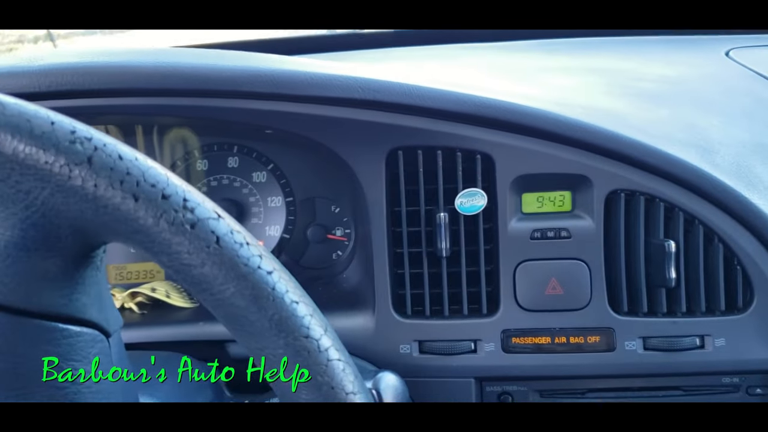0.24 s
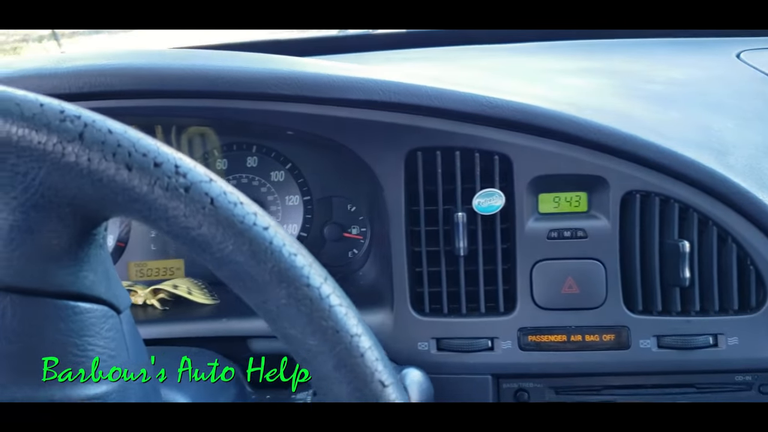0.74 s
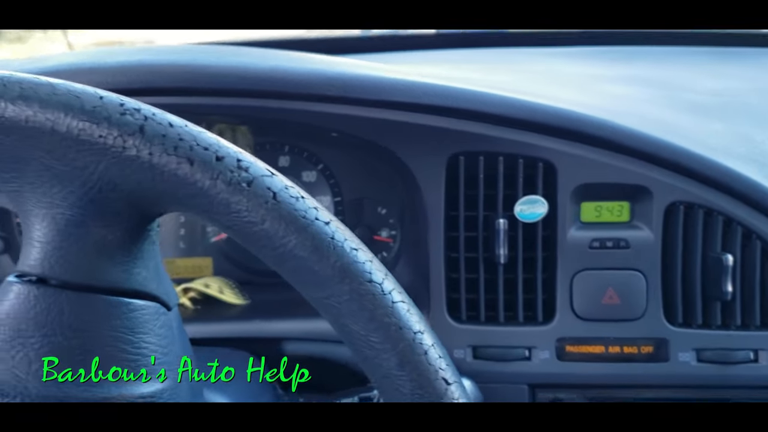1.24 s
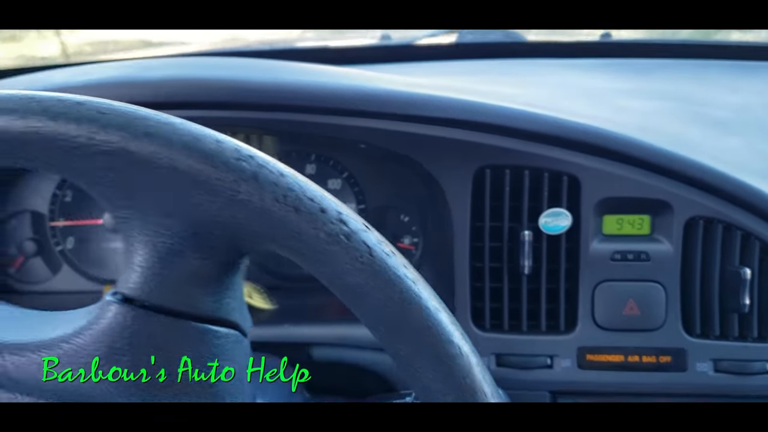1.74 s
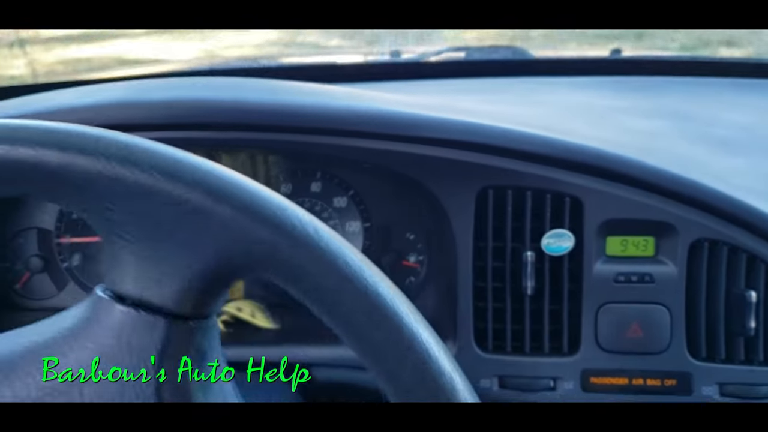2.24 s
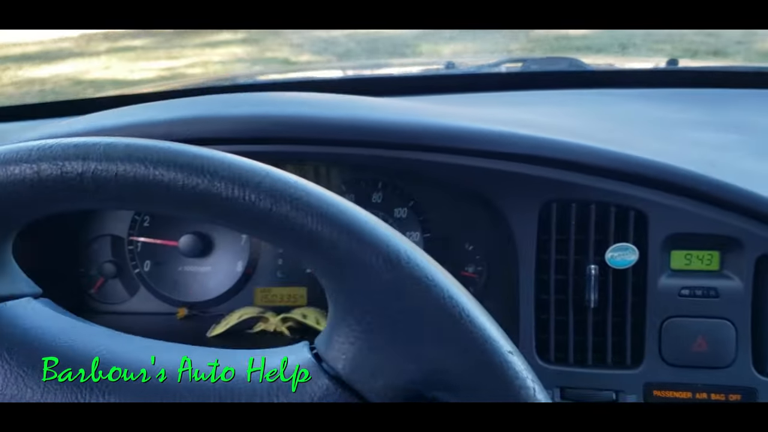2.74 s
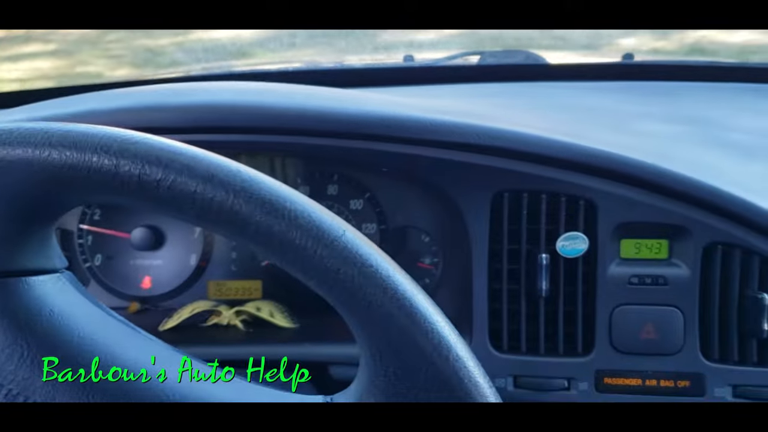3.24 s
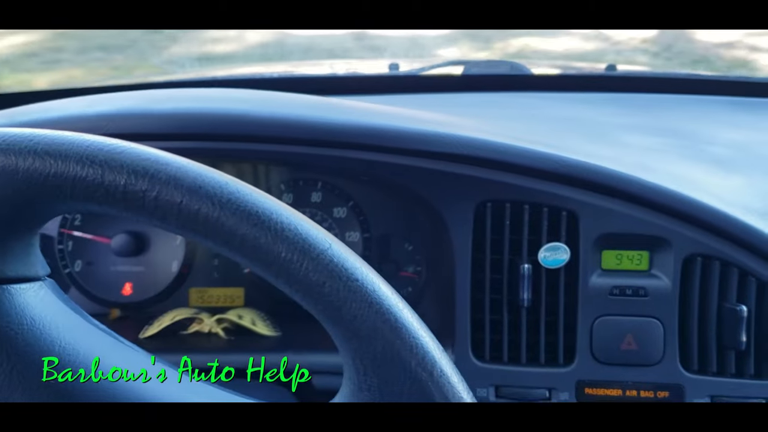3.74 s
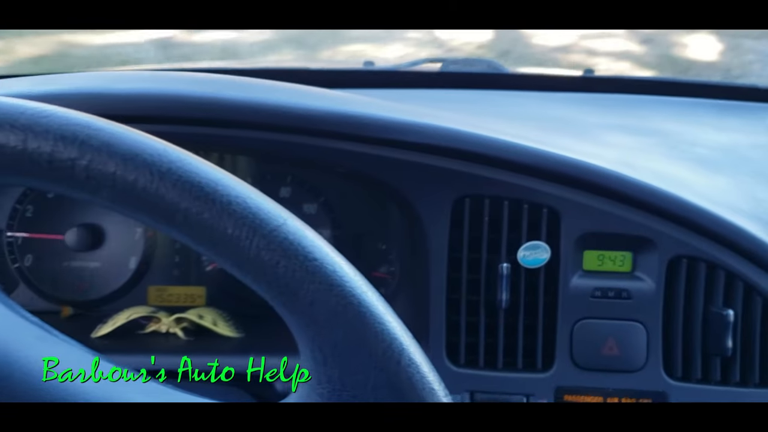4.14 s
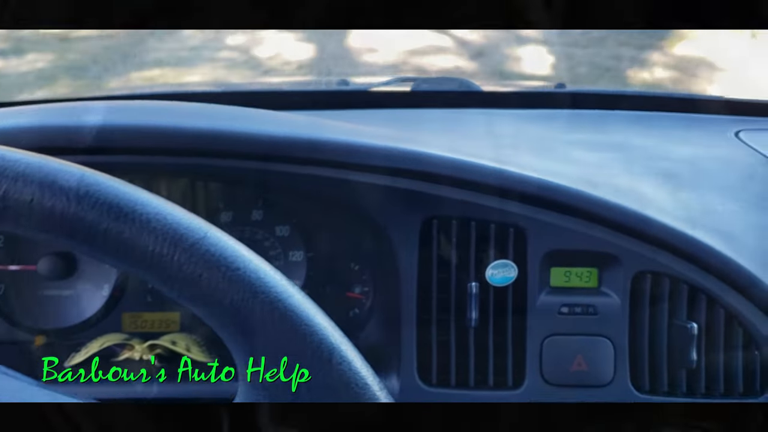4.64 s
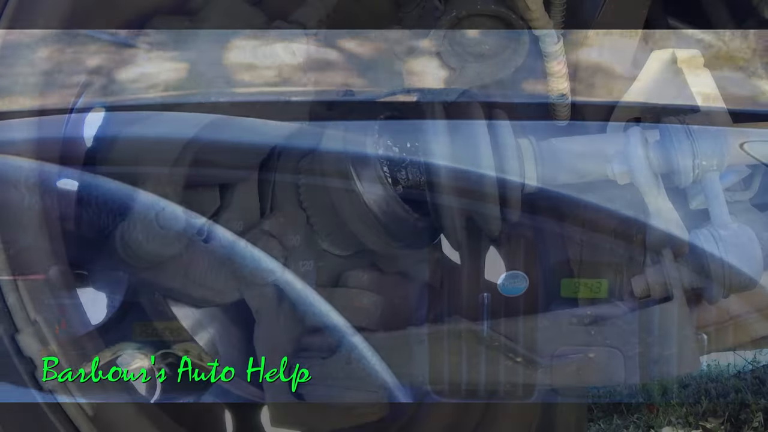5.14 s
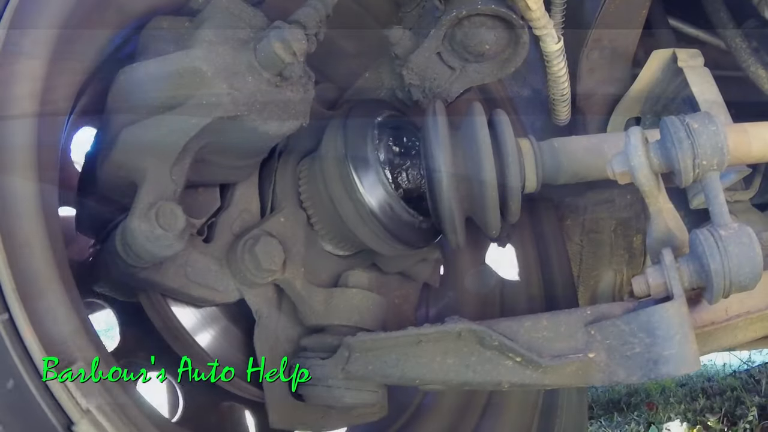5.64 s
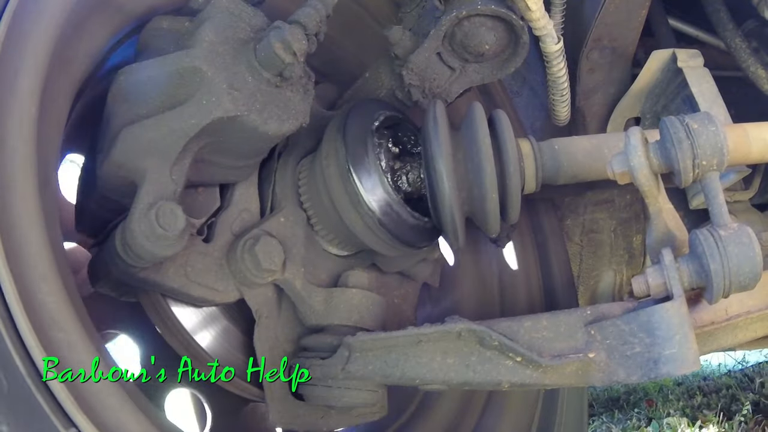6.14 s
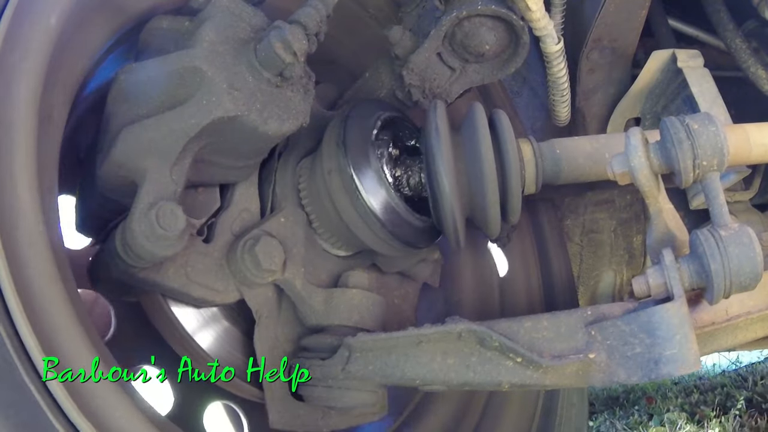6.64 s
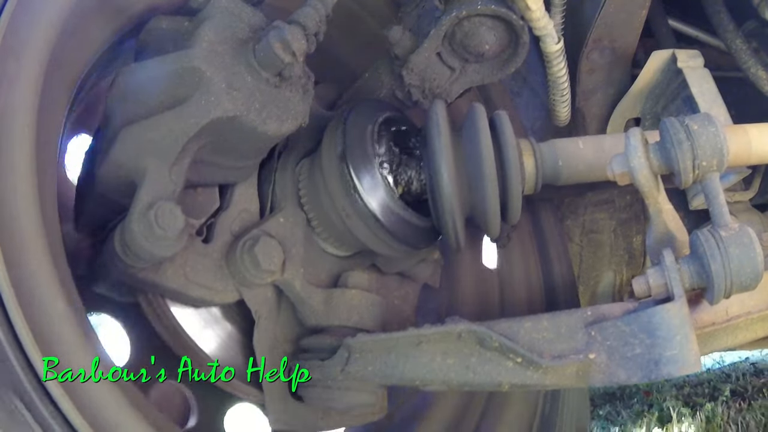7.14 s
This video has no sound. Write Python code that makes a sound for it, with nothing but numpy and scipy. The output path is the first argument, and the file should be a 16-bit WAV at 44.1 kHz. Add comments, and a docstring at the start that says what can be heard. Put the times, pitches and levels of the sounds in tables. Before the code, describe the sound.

Irregular knocks from a worn car axle joint over engine hum, shifting to louder underside rumble, rising whine and a sharp metallic crack.

```python
"""Worn drive joint in a tight turn

After a clatter in the cabin, a car creeps into a turn. The worn joint knocks through the resonances of
the body, over engine hum and rolling noise, while the steering groans and trim rattles. The sound then
blends to a microphone under the front wheel: exhaust pulses, gear whine, roar, hiss and ticking grit.
One sharp crack of the joint rings its housing and makes the limiter duck."""
import sys
import numpy as np
from scipy import signal
from scipy.io import wavfile
from scipy.ndimage import uniform_filter1d, map_coordinates

SR = 44100
rng = np.random.default_rng(int(sys.argv[2]) if len(sys.argv) > 2 else 0)


def wav_out(sig):
    """Save sig, one row per channel (or a flat mono array), as 16-bit PCM at SR to the path in sys.argv[1]."""
    wavfile.write(sys.argv[1], SR, np.round(np.clip(np.atleast_2d(sig).T, -1, 1) * 32767).astype(np.int16))


N = 325899
T = np.arange(N) / SR

# Driving as heard in the cabin: time_s, firing_hz, engine_db, rolling_db
CABIN_DRIVE = [(0, 31.8, -40.5, -40), (.7, 32.59, -40.5, -38.5), (2.05, 30.99, -39.5, -41.5),
               (2.3, 36.04, -29, -38.5), (2.55, 44.6, -38.5, -36), (2.82, 44.04, -34.5, -39),
               (3.08, 45.83, -34, -34), (3.35, 52.93, -35, -29.5), (3.65, 51, -35.5, -31),
               (3.85, 44.4, -38.5, -36), (4.02, 38.87, -33, -38.5), (4.3, 35.15, -40, -41.5),
               (4.6, 34.02, -41, -42)]
# Share of the cabin microphone: time_s, gain
CABIN_SHARE = [(4.6, 0.94), (5.6, 0.32)]
# Responses of the cabin air and the exhaust pipe: frequency_hz, gain_db
CABIN_RESPONSE = [(36, -6), (44, 3), (55, 3.5), (70, -3.5), (100, 3), (140, -5), (200, -0.5), (300, -8)]
PIPE_RESPONSE = [(30, 2), (57, 4), (65, -23), (75, 1), (86, -7), (93, 3), (105, -10.5), (118, 2), (143, -4),
                 (175, 4), (230, -1.5)]
# Noise spectra: frequency_hz, density_db
ROLLING_SPECTRUM = [(24, -13.5), (80, -3), (180, -9), (310, -12.5), (400, -9), (510, -20), (950, -23),
                    (3900, -58), (6000, -88)]
RUSTLE_SPECTRUM = [(1200, -24.5), (2500, 0), (3300, -4), (3900, -2.5), (4350, -12), (5500, -9.5),
                   (15000, -31.5)]
TRIM_SPECTRUM = [(1500, -28), (2500, -2), (4500, -8), (6400, -17.5), (10000, -27), (15700, -27.5)]
ROAR_SPECTRUM = [(150, -32), (250, 3), (660, -7.5), (1050, -2.5), (1560, -3.5), (2600, -6.5), (3170, -2.5),
                 (3500, -14.5), (4200, -14.5), (5400, -52)]
HISS_SPECTRUM = [(2100, -13), (4440, -12), (5200, 2.5), (5700, -1.5), (6080, -9.5), (6430, 1), (6800, -6),
                 (7270, -10), (9740, -18), (12500, -46)]
# Steering groans: start_s, length_s, from_hz, to_hz, level_db
GROANS = [(.5, .22, 335, 340, -41), (.72, .28, 254, 226, -38), (.42, .3, 195, 205, -38)]
# Hands sliding on the wheel: start_s, length_s, level_db
SWISHES = [(0.932, 0.26, -60), (1.1, 0.21, -62.5), (1.354, 0.17, -59.5), (2.589, 0.06, -50),
           (2.877, 0.063, -54.5)]
# Trim rattles: start_s, level_db
RATTLES = [(0.0777, -22), (0.086, -24), (0.095, -16.5), (0.1404, -32.5), (2.6, -41.5), (2.889, -40.5),
           (3.135, -38), (3.201, -39.5), (3.654, -23.5), (3.687, -39), (3.932, -42.5), (3.994, -46.5),
           (4.395, -43), (4.555, -45)]
# Snaps of a plastic catch and thumps of the seat or floor: start_s, peak_db
CATCH_SNAPS = [(0.088, -10.5), (.1396, -31)]
FLOOR_THUDS = [(.148, -29), (1.166, -18), (1.195, -12.5), (1.245, -20)]
# Driving as heard under the car: time_s, firing_hz, exhaust_db, roar_db
UNDER_DRIVE = [(4.55, 37.13, -37, -58), (4.78, 35.24, -34, -46.5), (5, 32.5, -34, -40),
               (5.2, 29.88, -24.5, -39.5), (5.45, 28.64, -27, -36), (5.9, 28.52, -22.5, -33.5),
               (6.25, 28.43, -23, -33), (6.5, 30.42, -17, -32), (6.7, 33, -22.5, -30),
               (6.88, 37.07, -17.5, -28), (7.05, 40.6, -15, -27), (7.21, 42.86, -15, -29)]
# Exhaust harmonics 1 to 8: level_db
EXHAUST_ORDERS = [1, -5, -9.5, -10, -11, -13.5, -21, -19.5]
# Glide of the gear whine: time_s, pitch_hz
WHINE_PITCH = [(6.2, 890), (6.45, 986), (6.63, 1030), (6.88, 1150), (7.05, 1244)]
# Its partials: pitch_ratio, over_roar_at_900_hz_db, rise_db_per_octave
WHINE_PARTIALS = [(1, -14, 0), (1.39, -21, 18)]
# Steady tones under the car: pitch_hz, over_roar_db
STEADY_TONES = [(595, -16), (1075, -9)]
# Knocks through the car body, an opening clatter in the cabin and then the joint's knocks:
# start_s, middle_band_peak_db, sharpness_db
BODY_KNOCKS = [(0.088, -17.5, 7), (0.096, -17.5, 0), (0.14, -20, 3), (0.315, -35, -2.5), (1.407, -29.5, -6),
               (1.431, -32.5, 3), (2.175, -38.5, -1), (2.368, -32.5, -1.5), (2.431, -29, 0),
               (2.468, -27.5, -9.5), (2.592, -26.5, -4.5), (2.71, -23, -2.5), (2.84, -20.5, -7),
               (2.886, -28.5, -3), (2.981, -27, -12.5), (3.036, -23, 0.5), (3.115, -23.5, -2),
               (3.138, -16.5, -3), (3.19, -16, -7.5), (3.26, -26.5, 5.5), (3.278, -22, 2), (3.303, -24, 5),
               (3.367, -12.5, -5.5), (3.425, -29.5, 6.5), (3.465, -28.5, 5.5), (3.497, -21.5, 2),
               (3.521, -21.5, -7), (3.568, -16.5, -3.5), (3.612, -25.5, 1.5), (3.653, -35, 17.5),
               (3.688, -33.5, 1), (3.752, -21, -4), (3.803, -31.5, 6), (3.848, -37.5, 6.5),
               (3.875, -29, -1.5), (3.934, -26, -6), (4.04, -35, 1), (4.224, -28.5, -3),
               (4.295, -34.5, -14), (4.415, -29.5, -5.5), (4.461, -34.5, -3), (4.623, -29.5, -3.5),
               (4.868, -26.5, 0)]
# Modes of the catch, floor pan, body, and joint housing with hub: centre_hz, width_hz, gain_db
CATCH_MODES = [(2970, 170, -10), (4300, 400, 3.5)]
FLOOR_MODES = [(194, 14.8, 4), (354, 150, -14.5), (145, 35, -11)]
BODY_BASS_MODES = [(253.4, 51, 7), (409, 64, 6), (522, 130, -2)]
BODY_MIDDLE_MODES = [(653, 124, 3), (959, 78, 7.5), (1220, 183, 0)]
BODY_TREBLE_MODES = [(1867, 180, 3), (2224, 320, 5), (2994, 170, -0.5), (4100, 220, -6.5)]
HOUSING_MODES = [(1193, 135, -4), (1750, 100, -5), (2520, 250, -5.5), (3130, 140, 0), (4830, 220, 4),
                 (5520, 140, 2.5), (6660, 800, -4.5), (9100, 210, -11)]

CRACK_S, CRACK_DB = 7.1125, 13


def amp(db):
    """Amplitude grows tenfold for every 20 dB."""
    return 10 ** (np.asarray(db) / 20)


def unit_rms(x):
    """Normalisation to unit mean power."""
    return x / np.sqrt(np.mean(x ** 2) + 1e-20)


def curves(rows):
    """Linear interpolation in time, one curve a column."""
    times, *columns = np.transpose(rows)
    return [np.interp(T, times, column) for column in columns]


def add(mix, start_s, sound):
    """Superposition of a delayed sound on the mix."""
    part = mix[round(start_s * SR):][:len(sound)]
    part += sound[:len(part)]


def drift(rate_hz):
    """Slow random modulation: a spline through Gaussian values."""
    knots, coarse = rng.standard_normal(60), T[::200]
    return np.interp(T, coarse, map_coordinates(knots, [coarse * rate_hz], order=3, mode="wrap"))


def noise(spectrum, patchy_db, flicker_db, size=512):
    """Spectral shaping of Gaussian noise, with drifting patches and a flicker common to all bands."""
    frames, hz = 4 * N // size + 5, np.fft.rfftfreq(size, 1 / SR)
    real, imag, patches = rng.standard_normal((frames, len(hz), 3)).T
    patches = unit_rms(uniform_filter1d(uniform_filter1d(patches, size=6, axis=0), size=12, axis=1))
    flicker = unit_rms(uniform_filter1d(rng.standard_normal(frames), size=3))
    points_hz, db = np.transpose(spectrum)
    gain = amp(np.interp(np.log(hz + 1), np.log(points_hz + 1), db, -100, -100))
    bins = (real + 1j * imag) * gain[:, None] * amp(patchy_db * patches + flicker_db * flicker)
    return unit_rms(signal.istft(bins, nperseg=size, noverlap=3 * size // 4)[1][:N])


def ring(modes, t60_s, rise_s, detune, strike=2.8):
    """Modal response: a contact pulse and its scattered tail excite broad resonances; peak 1."""
    t = np.arange(5000) / SR
    hz, width, db = np.transpose(modes)[:, :, None]
    hz = hz * (1 + detune * rng.standard_normal(hz.shape))
    decay = amp(-60 * t / t60_s) + 0.057 * amp(-20 * t / t60_s)
    blow = rng.standard_normal(len(t)) * decay * (1 - np.exp(-t / rise_s)) ** 2
    blow[:6] += strike * np.hanning(6)  # first contact
    db = db + 2.5 * rng.standard_normal(db.shape) * (detune > 0)  # detuned modes vary in level too
    blunt = signal.butter(4, [.55 * hz.min(), 1.3 * hz.max()], "bandpass", fs=SR, output="sos")
    u = 2 * np.pi * width * t  # the soft start u exp(-u) gives each resonance steep skirts
    response = (amp(db) * width * u * np.exp(-u) * np.cos(2 * np.pi * hz * t)).sum(0)
    out = signal.fftconvolve(signal.sosfilt(blunt, blow), response)[:len(t)]
    return out / abs(out).max()


def orders(firing_hz, levels_db, response, lag_rad, waver_db, wander_rad=0.21):
    """Source and filter: harmonics of the firing rate, the higher ones lagging and wavering more."""
    cycles = np.cumsum(firing_hz) / SR
    response_hz, gain_db = np.transpose(response)
    out = np.zeros(N)
    for k, db in enumerate(levels_db, start=1):
        level_db = db + np.interp(k * firing_hz, response_hz, gain_db) + waver_db * np.sqrt(k) * drift(6)
        phase = 2 * np.pi * k * cycles - lag_rad * k ** 2 + wander_rad * k * drift(7)
        out += amp(level_db) * np.cos(phase)
    return out


def fuzzy_tone(hz, width_hz):
    """Line broadening: low-passed noise modulates a carrier."""
    pole = np.exp(-np.pi * width_hz / SR)
    slow = signal.lfilter([1 - pole], [1, -pole], rng.standard_normal(N) + 1j * rng.standard_normal(N))
    slow = slow / np.sqrt(abs(slow))  # its level wavers less than its phase
    carrier = np.exp(2j * np.pi * np.cumsum(hz * np.ones(N)) / SR)
    return unit_rms((slow * carrier).real)


def cabin_drone(fan_db=-74):
    """Engine harmonics drive the cabin air over rolling noise; rustle and fan add in power."""
    firing_hz, engine_db, rolling_db = curves(CABIN_DRIVE)
    engine = orders(firing_hz, -2.5 * np.arange(7), CABIN_RESPONSE, lag_rad=0.402, waver_db=3)
    rolling = noise(ROLLING_SPECTRUM, patchy_db=2.5, flicker_db=2, size=2048)
    rustle = noise(RUSTLE_SPECTRUM, patchy_db=1.5, flicker_db=2)
    rustle_gain = np.hypot(amp(1.206 * rolling_db - 21), amp(fan_db))  # grows faster than the rolling
    return amp(engine_db + 3) * engine + amp(rolling_db + 2.5) * rolling + rustle_gain * rustle


def steering_groans():
    """Frequency glides: short, swelling sine tones as the wheel is turned."""
    out = np.zeros(N)
    for start_s, length_s, from_hz, to_hz, db in GROANS:
        hz = np.linspace(from_hz, to_hz, round(length_s * SR))
        add(out, start_s, amp(db + 4.5) * np.hanning(len(hz)) * np.sin(2 * np.pi * np.cumsum(hz) / SR))
    return out


def rattles_and_swishes(hard_above_db=-35, hard_s=0.0098, soft_s=0.015):
    """Amplitude-modulated noise: trim rattles in bursts, harder ones brighter; sliding hands swish."""
    hard, soft, swish = np.zeros((3, N))
    t = np.arange(5000) / SR
    for start_s, db in RATTLES:
        envelope, length_s = (hard, hard_s) if db > hard_above_db else (soft, soft_s)
        burst = np.exp(-(t / length_s) ** 1.6) + 0.081 * np.exp(-t / 0.029)
        add(envelope, start_s, amp(db - 8) * burst)
    for start_s, length_s, db in SWISHES:
        add(swish, start_s, amp(db) * np.hanning(round(length_s * SR)))
    grain = amp(4.6 * unit_rms(uniform_filter1d(rng.standard_normal(N), size=40)))
    rub = noise(TRIM_SPECTRUM, patchy_db=-2, flicker_db=1.5, size=256)
    chatter = unit_rms(grain * rub)
    bright_rub = unit_rms(np.gradient(np.gradient(rub)))
    muffle = signal.butter(3, 8400, fs=SR, output="sos")
    return hard * chatter + signal.sosfilt(muffle, soft * chatter + swish * bright_rub)


def snaps_and_thuds():
    """Damped vibration: a plastic catch rings high and briefly, the floor pan low and longer."""
    out = np.zeros(N)
    for start_s, db in CATCH_SNAPS:
        add(out, start_s, amp(db) * ring(CATCH_MODES, t60_s=0.017, rise_s=0.0002, detune=0))
    for start_s, db in FLOOR_THUDS:
        add(out, start_s, amp(db) * ring(FLOOR_MODES, t60_s=0.077, rise_s=0.0027, detune=0, strike=0))
    return out


def gritty_hiss(ticks_per_s=38, tick_s=0.0015):
    """A Poisson process: grit ticks near the wheel as brief swells of the hiss."""
    sizes = amp(3.5 * np.minimum(rng.exponential(1, N), 4))
    impacts = sizes * (rng.random(N) < ticks_per_s / SR)
    u = np.arange(1000) / SR / tick_s
    ticks = unit_rms(signal.oaconvolve(impacts, u ** 2 * np.exp(-u))[:N])
    return (amp(-2.5) + amp(-14.5) * ticks) * noise(HISS_SPECTRUM, patchy_db=0, flicker_db=0.5)


def gear_whine():
    """Two inharmonic partials glide up together, the upper one gaining level with pitch."""
    hz = curves(WHINE_PITCH)[0]
    octaves = np.log2(hz / 900)
    return sum(amp(db + rise_db * octaves) * fuzzy_tone(ratio * hz, width_hz=15 / ratio ** 3)
               for ratio, db, rise_db in WHINE_PARTIALS)


def exhaust(firing_hz, load, coast_db=-4):
    """Pipe resonances colour a pulse train whose fundamental sinks off load."""
    levels_db = [EXHAUST_ORDERS[0] + coast_db * (1 - load), *EXHAUST_ORDERS[1:]]
    return orders(firing_hz, levels_db, PIPE_RESPONSE, lag_rad=0.1045, waver_db=1.5)


def underside():
    """Superposition under the car: exhaust, with rumble, roar, tones and hiss on one level curve."""
    firing_hz, exhaust_db, roar_db = curves(UNDER_DRIVE)
    load = np.clip((CRACK_S - T) * 20, 0, 1)  # dies away in the 50 ms before the crack
    pulses = amp(exhaust_db) * exhaust(firing_hz, load)
    rumble_spectrum = [(12, -8), (60, 3), (200, 7.5), (420, -7.5), (520, -22)]
    rumble = amp(-2) * noise(rumble_spectrum, patchy_db=0.5, flicker_db=3, size=2048)
    roar = noise(ROAR_SPECTRUM, patchy_db=1.15, flicker_db=0.86)
    whine = load * gear_whine()
    tone_gain = amp(-1.5 * np.maximum(firing_hz - 30.1, 0))  # sinks at firing rates over 30.1 Hz
    tones = tone_gain * sum(amp(db) * fuzzy_tone(hz, width_hz=8) for hz, db in STEADY_TONES)
    return pulses + amp(roar_db) * (rumble + roar + whine + tones + gritty_hiss())


def body_knocks():
    """Structure-borne sound: a cabin clatter, then the joint, rings the body; the bass swings up last."""
    out = np.zeros(N)
    for start_s, db, sharp_db in BODY_KNOCKS:
        treble = ring(BODY_TREBLE_MODES, t60_s=0.076, rise_s=0.00024, detune=0.022)
        middle = ring(BODY_MIDDLE_MODES, t60_s=0.069, rise_s=0.0009, detune=0.028, strike=1.6)
        bass = ring(BODY_BASS_MODES, t60_s=0.083, rise_s=0.0024, detune=0.056, strike=0.6)
        # a sharper blow has more treble and less bass
        knock = amp(sharp_db - 9.5) * treble + middle + amp(-1.5 - 0.87 * sharp_db) * bass
        add(out, start_s, amp(db) * knock)
    return out


def joint_crack():
    """Impulse excitation: one hard blow rings the housing and hub."""
    out = np.zeros(N)
    crack = ring(HOUSING_MODES, t60_s=0.037, rise_s=0.00005, detune=0, strike=4.4)
    add(out, CRACK_S, amp(CRACK_DB) * crack)
    return out


def scene():
    """A crossfade: the cabin recedes as the underside comes in."""
    cabin = cabin_drone() + body_knocks() + snaps_and_thuds() + steering_groans() + rattles_and_swishes()
    under_share = np.clip((T - 4.5) / 0.17, 0, 1)
    return (curves(CABIN_SHARE)[0] * cabin + under_share * underside() + joint_crack())[None]


def record(dry, threshold_db=-2.9, ahead_s=0.051, release_db_per_s=24.6, cutoff_hz=15650):
    """Look-ahead limiting: the gain drops before a peak and recovers slowly; a low-pass follows."""
    over_db = np.maximum(20 * np.log10(abs(dry[0]) + 1e-9) - threshold_db, 0)
    ahead = round(ahead_s * SR)
    over_db = np.concatenate([over_db[ahead:], np.zeros(ahead)])
    release_db = T * release_db_per_s
    held_db = np.maximum.accumulate(over_db + release_db) - release_db
    limited = dry / amp(uniform_filter1d(held_db, size=60))
    lowpass = signal.firwin(1023, cutoff_hz, window=("kaiser", 9), fs=SR)
    return signal.oaconvolve(limited, lowpass[None], "same")


dry = scene()
out = record(dry)
wav_out(out)
```